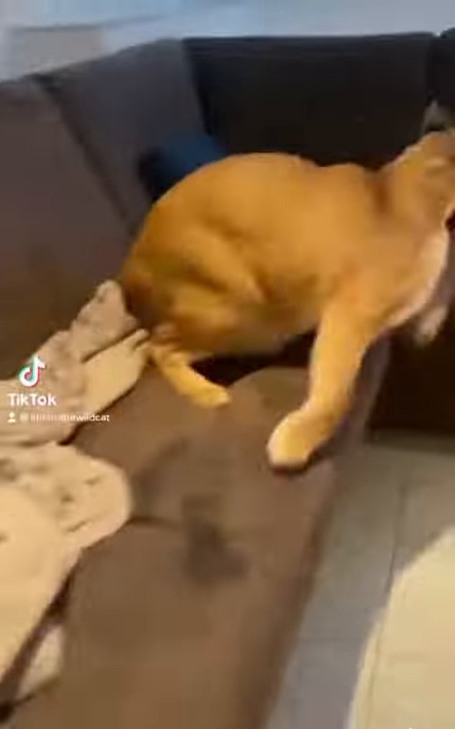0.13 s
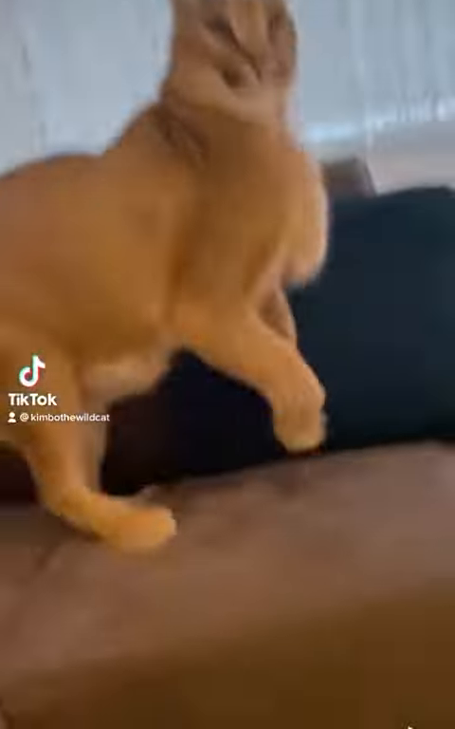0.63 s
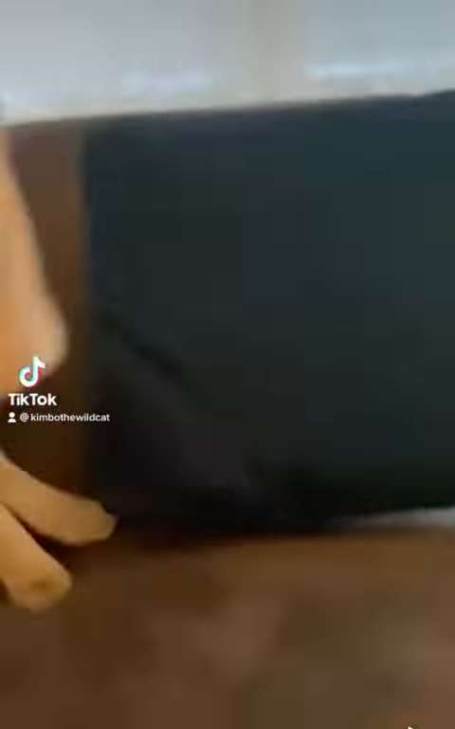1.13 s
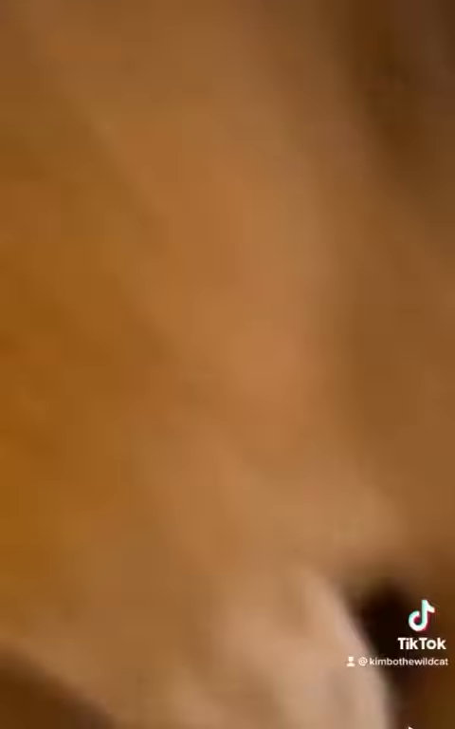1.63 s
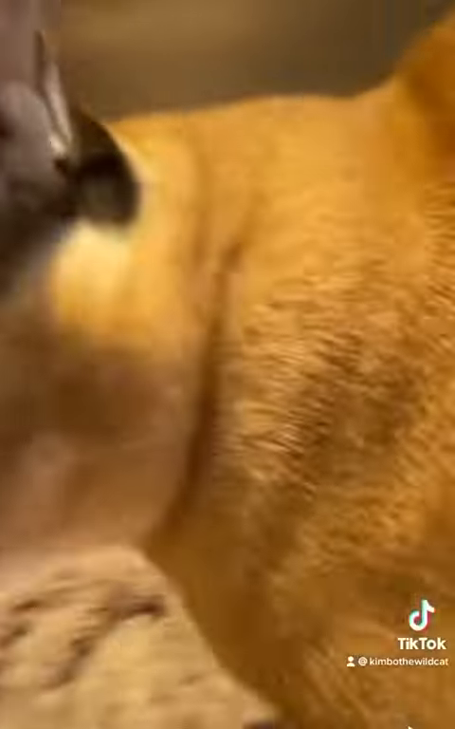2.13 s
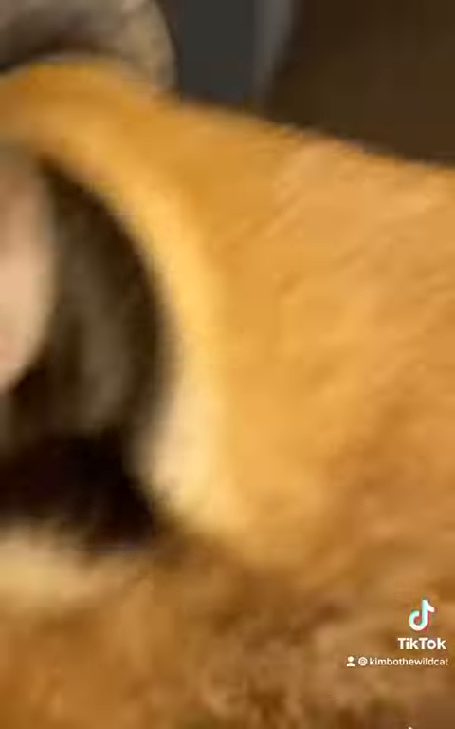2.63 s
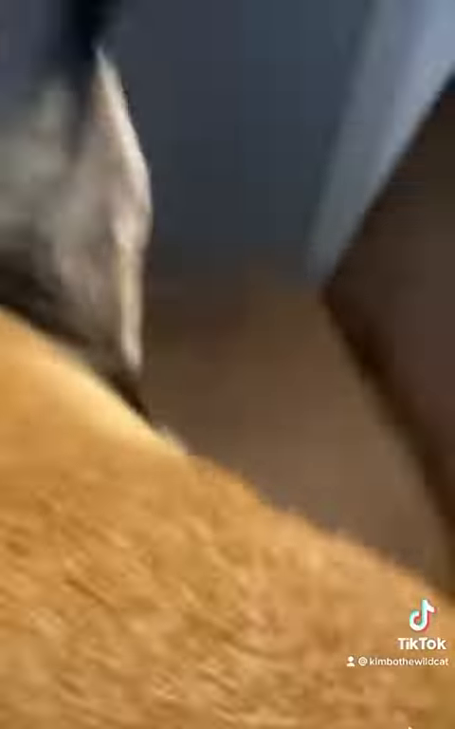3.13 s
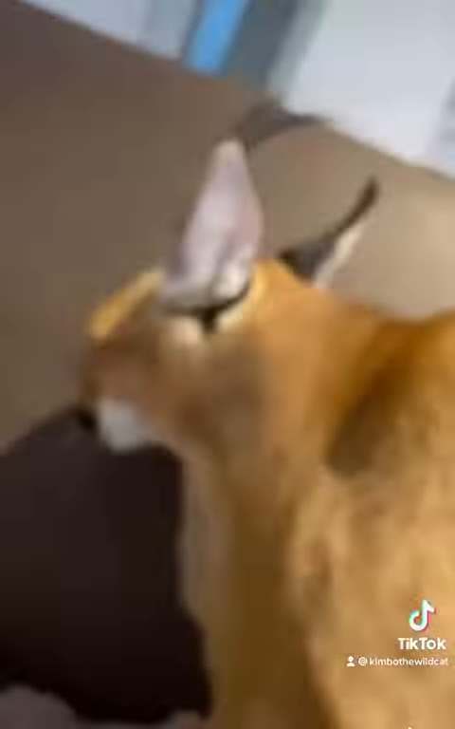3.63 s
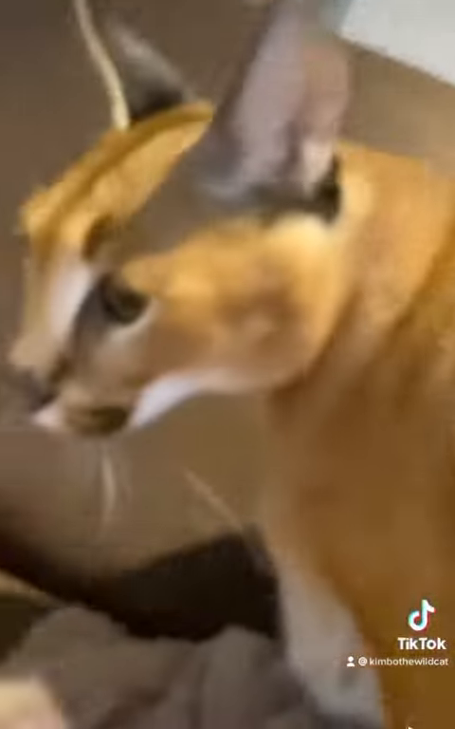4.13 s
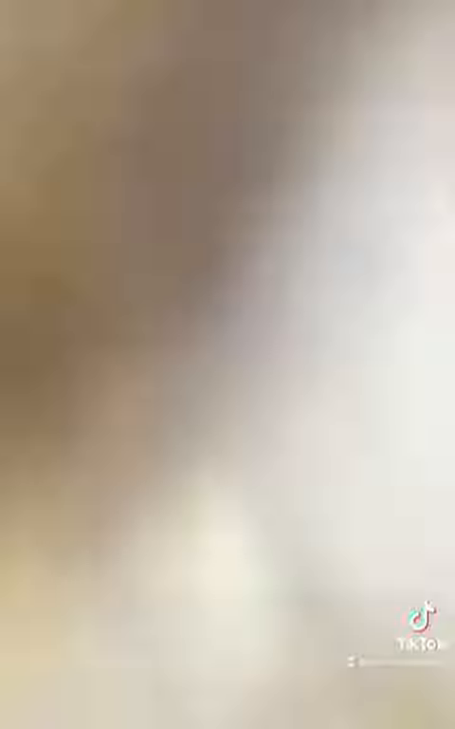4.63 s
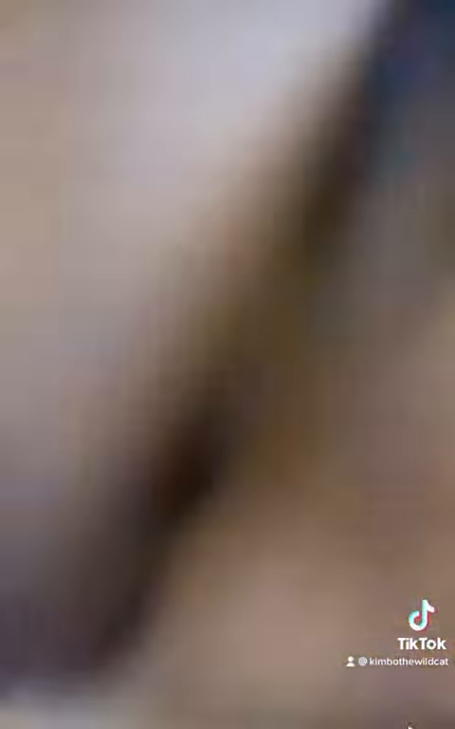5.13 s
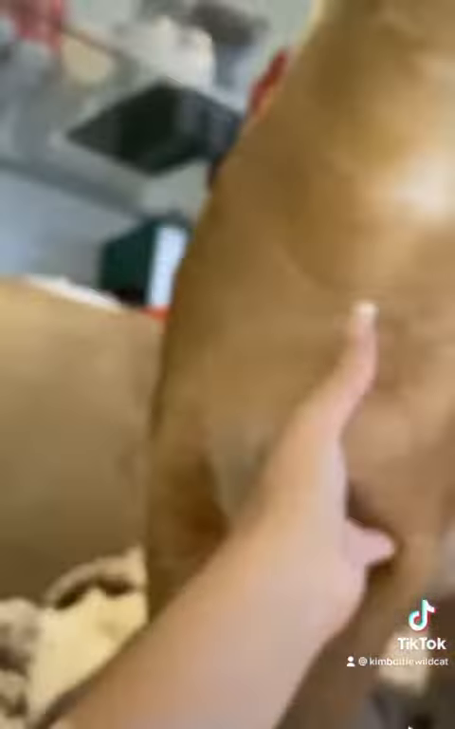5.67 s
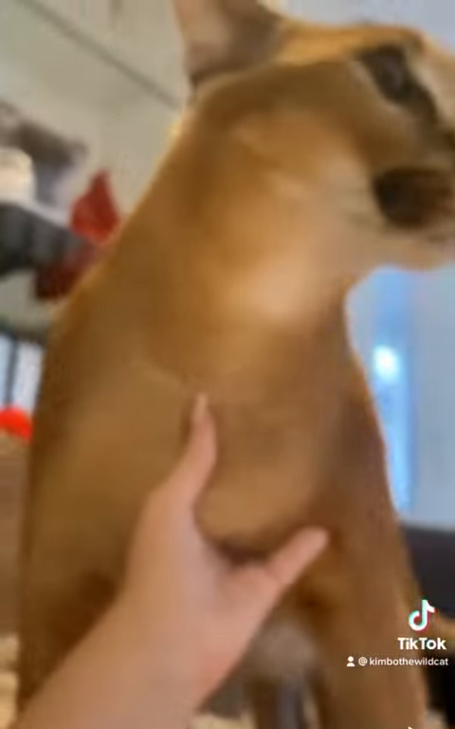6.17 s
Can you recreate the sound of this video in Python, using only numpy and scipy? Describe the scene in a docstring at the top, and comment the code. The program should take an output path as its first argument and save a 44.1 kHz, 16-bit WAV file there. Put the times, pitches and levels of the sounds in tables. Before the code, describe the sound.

Low padded paw thumps and cushion rumble with scuffing cloth, a sharp claw snap, hollow little taps and fur brushing close, fading to near silence.

```python
"""In a hard-floored room with a quiet hum of air, a large cat jumps and scrambles over a fabric sofa,
close to a hand-held phone. Paws thump as gliding, damped tones; noise-driven modes rumble in cushion and frame.
Cloth and fur rustle as coloured, flickering noise, claws tick as short noise bursts, and a small hollow
part pings. The ticks alone excite the room's tail; two ports a little apart hear it all in stereo."""
import sys
import numpy as np
from scipy import signal
from scipy.fft import rfft, irfft
from scipy.io import wavfile
from scipy.ndimage import uniform_filter1d

SR = 44100
rng = np.random.default_rng(int(sys.argv[2]) if len(sys.argv) > 2 else 0)


def gain_from_db(level_db):
    """Turn a decibel level (scalar or array-like) into a linear amplitude factor."""
    decades = np.asarray(level_db, float) / 20
    return 10 ** decades


def log_audio(samples):
    """Write samples as a 16-bit WAV file to the path given in sys.argv[1]."""
    # one column per channel
    frames = np.atleast_2d(samples).T
    # limit to full scale, then quantise
    limited = np.clip(frames, -1, 1)
    pcm = np.round(limited * 32767).astype(np.int16)
    wavfile.write(sys.argv[1], SR, pcm)


N = 276948
T = np.arange(N) / SR
SLOW = T[::32]  # coarse clock for gains, s


def unit(x):
    """Scale to rms 1."""
    return x / np.sqrt(np.mean(x ** 2))


def colour(x, points):
    """Causal filter through (freq_hz, level_db) points, from the folded cepstrum of the log gain."""
    hz, db = np.transpose(points)
    log_hz = np.log(np.maximum(np.fft.rfftfreq(8192, 1 / SR), 1))
    cepstrum = irfft(np.log(gain_from_db(np.interp(log_hz, np.log(hz), db))))
    # folding the later half onto the earlier makes the response minimum phase
    cepstrum[1:4096] *= 2
    cepstrum[4097:] = 0
    response = irfft(np.exp(rfft(cepstrum)))
    return signal.fftconvolve(x, response)[:len(x)]


def resonance(x, hz, width_hz):
    """Two-pole band-pass: one damped mode."""
    return signal.lfilter(*signal.iirpeak(hz, hz / width_hz, fs=SR), x)


def walk(rate):
    """Random levels, rate new ones per second, joined by ramps; spread 1."""
    hold = int(SR / rate)
    levels = np.repeat(rng.standard_normal(N // hold + 1), hold)
    return unit(uniform_filter1d(levels, hold)[:N])


def add(track, s, sound):
    """Mix a sound in at time s."""
    i = int(s * SR)
    track[..., i:i + sound.shape[-1]] += sound[..., :N - i]


def curve(table):
    """A (time_s, level_db) table over time, in dB."""
    return np.interp(SLOW, *np.transpose(table))


def smooth(gain):
    """A slow gain drawn out to every sample."""
    return np.interp(T, SLOW, gain)


def together(gains):
    """Unrelated sounds add in power."""
    return np.sqrt(sum(g ** 2 for g in gains))


def burst(s, rise_s, fade_s):
    """Gain that rises at time s and loses 20 dB every fade_s."""
    t = np.maximum(SLOW - s, 0)
    return (1 - np.exp(-t / rise_s)) * gain_from_db(-20 * t / fade_s)


def air_noise(spectrum, db):
    """Steady noise shaped to a spectrum, its level wavering by about 1 dB."""
    noise = unit(colour(rng.standard_normal(N), spectrum))
    return gain_from_db(db + 1.1 * walk(11.0)) * noise


# hum and hush of the room in the sum of the ports: freq_hz, level_db
AIR_SUM = [(18, -31), (30, 1), (71, -5), (103, -6), (204, -22.5), (239, -0.5), (287, -16.5), (684, -26),
           (1500, -46), (8000, -38), (16000, -64.5)]


def air_in_sum():
    """Room air that presses on both ports alike."""
    return air_noise(AIR_SUM, -63.5)


# the same air in the difference of the ports: freq_hz, level_db
AIR_DIFFERENCE = [(18, -56), (30, -25), (134, -1), (684, -5.5), (1010, -14), (4190, -25.5), (8740, -10.5),
                  (16000, -34.5)]


def air_in_difference():
    """Room air that differs between the ports."""
    return air_noise(AIR_DIFFERENCE, -69)


# decay time of each reverberant band: freq_hz, t60_s
ROOM_DECAY = [(250, 0.6), (1000, 0.51), (3000, 0.51), (8000, 0.33)]


def room(x, first_s=0.0056):
    """Dense reflections after a short gap, the highest band dying first; unrelated in sum and difference."""
    t = T[:SR]
    tail = np.zeros((2, SR))
    for hz, t60 in ROOM_DECAY:
        band = resonance(rng.standard_normal((2, SR)), hz, 1.7 * hz)
        tail += band * gain_from_db(-60 * t / t60) / np.sqrt(hz / 1000)
    tail = tail * (t > first_s)
    tail = tail / np.sqrt(np.sum(tail[0] ** 2)) * gain_from_db(12.5)
    return signal.fftconvolve(x[None], tail, axes=1)[:, :N]


def nearby(x, count, span_s=.012, echo_db=-17):
    """Early echoes off seat back, wall and floor comb the sound into uneven bands."""
    lags = rng.integers(40, int(span_s * SR), count)
    signs = rng.choice([-1, 1], count)
    echoes = sum(gain_from_db(echo_db) * sign * np.roll(x, lag, axis=1) for lag, sign in zip(lags, signs))
    return (x + echoes) / np.sqrt(1 + count * gain_from_db(2 * echo_db))


# weight shifting on the cushions: time_s, level_db
WEIGHT = [(0.0, -37.5), (0.31, -34.5), (0.93, -40), (1.08, -33), (1.52, -40.5), (2.76, -54.5), (3.25, -44),
          (3.38, -44.5), (3.58, -58.5), (3.93, -64.5), (4.42, -50.5), (5.02, -62.5), (5.98, -63.5),
          (6.28, -69.5)]
# low modes of cushion and frame: freq_hz, width_hz, level_db
CUSHION_MODES = [(56.8, 40, 6.5), (85, 48.5, -1), (134.9, 55, -13)]


def cushions():
    """Random pushes ring the low modes of cushion and frame, which shakes on after each thump."""
    push = rng.standard_normal((2, N))
    shake_db, shake_rise_s, shake_t60_s = -22, 0.0073, 0.7485  # level relative to the thump
    shakes = [gain_from_db(db + shake_db) * burst(s, shake_rise_s, shake_t60_s / 3) for s, db, _, _ in THUMPS]
    load = smooth(together([gain_from_db(curve(WEIGHT))] + shakes))
    rumble = sum(gain_from_db(db) * resonance(resonance(push, hz, width), hz, width)
                 for hz, width, db in CUSHION_MODES)
    return load * unit(rumble)


def rubbing(spectrum, flicker_db, rate, grain_db):
    """Fibres slip in short bunches: noise whose level flickers, with finer, faster grains."""
    slips = gain_from_db(flicker_db * walk(rate) + grain_db * walk(600.))
    return np.array([unit(colour(slips * rng.standard_normal(N), spectrum)) for _ in range(2)])


def patchy(x):
    """Each band of cloth noise swells and dips alone, as different folds slip."""
    spread_db, rate = 2.5, 30.  # rate: changes per s
    bands_hz = 600 * 1.5 ** np.arange(7)
    return x + sum((gain_from_db(spread_db * walk(rate)) - 1) * resonance(x, hz, hz / 2) for hz in bands_hz)


# cloth dragged by a sudden push, then fading 20 dB: start_s, drag_db, swish_db, fade_s
CLOTH_SCUFFS = [(0.303, -36.5, -47, 0.1849), (0.538, -31.5, -46, 0.1135), (0.711, -44, -50, 0.29),
                (.928, -32.5, -47, .05), (0.948, -30.5, -59, 0.2461), (1.796, -42, -60.5, 0.24),
                (1.985, -48, -66, 0.32), (2.281, -48, -56.5, 0.14), (3.284, -40.5, -58, 0.04),
                (4.72, -54, -83, 0.33)]
# cloth sweeps that swell and ebb, 20 dB down at reach_s from the middle: middle_s, drag_db, swish_db, reach_s
CLOTH_SWEEPS = [(.02, -52.5, -56.5, 0.67), (0.172, -41, -54, 0.22), (1.193, -44, -51.5, 0.036),
                (1.457, -47, -55.5, 0.0732), (1.58, -42, -56, 0.0244), (1.64, -55.5, -66, 0.14),
                (1.7, -43, -55, 0.03), (2.145, -60, -70.5, 0.24), (2.484, -51.5, -66, 0.11),
                (2.97, -54.5, -66.5, 0.25), (3.15, -59, -65.5, 0.2), (3.62, -64.5, -71, 0.33),
                (5.3, -63.5, -67.5, 0.41)]


def strokes(column, restless_db):
    """Gain of one cloth layer: rubbing that follows the shifting weight, plus every scuff and sweep."""
    # restless_db holds at a load of -40.5 dB; each dB of load moves it by 0.596 dB
    restless = gain_from_db(restless_db + 0.596 * (curve(WEIGHT) + 40.5))
    scuffs = [gain_from_db(r[column]) * burst(r[0], 0.003, r[3]) for r in CLOTH_SCUFFS]
    sweeps = [gain_from_db(r[column] - 20 * np.minimum(((SLOW - r[0]) / r[3]) ** 2, 10)) for r in CLOTH_SWEEPS]
    return together([restless] + scuffs + sweeps)


# fur brushing the phone itself: start_s, length_s, hollow_db, hiss_db, sag_db_per_s
FUR_BRUSHES = [(2.871, 0.13, -50, -60, 13), (4.391, 0.09, -46, -50.5, 32), (4.5, 1.14, -78, -67.5, 3),
               (4.555, 0.15, -53.5, -59, 46), (5.185, 0.1001, -74, -63, -78)]


def brush(column):
    """Gains of the fur touches: quick start, slow sag (or swell, if negative), soft lift."""
    rise_s, fade_s = 0.0046, 0.039  # fade: time to lose 20 dB after the fur lifts
    gains = []
    for row in FUR_BRUSHES:
        start, length, sag = row[0], row[1], row[4]
        t = SLOW - start
        lift_db = 20 * np.clip(t - length, 0, 1) / fade_s
        level = gain_from_db(row[column] - sag * np.clip(t, 0, length) - lift_db)
        gains.append(level * np.clip(t / rise_s, 0, 1))
    return gains


# dull drag of cloth: freq_hz, level_db
DRAG_SPECTRUM = [(120, -18), (250, 5), (450, 2.5), (700, -3.5), (1100, -11.5), (4000, -33)]
# bright swish of cloth: freq_hz, level_db
SWISH_SPECTRUM = [(300, -10.5), (1100, -2), (3000, -4.5), (6000, -15.5), (16500, -38.5)]
# hiss of fur: freq_hz, level_db
FUR_SPECTRUM = [(700, -22), (1300, -9.5), (2800, -3.5), (6000, -6), (12000, -5), (16000, -13)]


def rustle():
    """Drag and swish of cloth, the hiss of fur, and the cavity that brushing fur rings."""
    drag_gain = strokes(column=1, restless_db=-63.5)
    swish_gain = strokes(column=2, restless_db=-70.5)
    drag = smooth(drag_gain) * rubbing(DRAG_SPECTRUM, 2, 40., 3)
    swish = smooth(swish_gain) * rubbing(SWISH_SPECTRUM, 1.5, 30., 3)
    fur = rubbing(FUR_SPECTRUM, 1.5, 50., 2.5)
    raw = rubbing([(100, 0), (10000, 0)], 2, 70., 3)  # flat spectrum
    cavity_hz, width_hz = 660, 240
    hollow = unit(resonance(resonance(raw, cavity_hz, width_hz), cavity_hz, width_hz))
    # a little fur and hollow is heard in every swish
    fur_gain = together(brush(column=3) + [gain_from_db(-6.5) * swish_gain])
    hollow_gain = together(brush(column=2) + [gain_from_db(-10) * swish_gain])
    return patchy(drag + swish) + smooth(fur_gain) * fur + smooth(hollow_gain) * hollow


# small hollow part struck: start_s, level_db
HOLLOW_PINGS = [(1.331, -29.5), (1.819, -30.5), (1.87, -41.5), (2.064, -38), (2.223, -35), (2.243, -46.5),
                (2.345, -36.5), (2.46, -36), (2.711, -45), (2.888, -34), (2.904, -29), (2.954, -38),
                (2.98, -36), (3.063, -49), (3.415, -46), (4.442, -31.5), (4.448, -38.5), (4.454, -26),
                (4.472, -40), (4.85, -47.5), (4.927, -47), (6.261, -43.5)]


def pings(swell_s=0.0012):
    """One small damped cavity, a few cycles that swell and die."""
    out, t = np.zeros(N), T[:SR // 20]
    shape = (t / swell_s) ** 2 * np.exp(2 - t / swell_s) / 4
    for s, db in HOLLOW_PINGS:
        hz = 673 * (1 + 0.03 * rng.standard_normal())
        add(out, s, gain_from_db(db) * shape * np.sin(2 * np.pi * hz * t))
    return out


# claws catching and slaps on cloth: start_s, level_db, centre_hz, decay_s
CLAW_TICKS = [(0.199, -29, 2470, 0.0015), (0.303, -29.5, 5500, 0.0025), (0.318, -31.5, 5610, 0.0038),
              (.531, -29.5, 3800, 0.00219), (0.54, -25, 1300, 0.0014), (0.711, -35.5, 4430, 0.0016),
              (0.924, -35.5, 2230, 0.0019), (0.936, -18.5, 2400, 0.0046), (0.9512, -11.5, 3280, 0.00049),
              (.953, -11, 1300, 0.0018), (1.366, -43.5, 6940, 0.00085), (1.986, -43.5, 1700, 0.002),
              (2.849, -43.5, 900, 0.0011), (2.991, -48.5, 2200, 0.00204), (4.727, -43, 1700, 0.002),
              (4.848, -48, 3465, 0.0011), (4.927, -42.5, 3700, 0.00091), (5.28, -47, 2005, 0.0012),
              (6.259, -51, 1478, 0.000515)]


def ticks(spread=0.99):
    """Short broad noise bursts as (sum, difference, one snap sent to the room)."""
    out, t = np.zeros((3, N)), T[:SR // 10]
    snap_db = -17  # relative to the tick
    for s, db, hz, decay in CLAW_TICKS:
        noise = rng.standard_normal((2, len(t))) * np.sqrt(t) * np.exp(-t / decay)
        bursts = np.vstack([noise, t == 0])
        bursts = resonance(resonance(bursts, hz, spread * hz), hz, 2 * spread * hz)
        bursts = bursts / abs(bursts).max(axis=1, keepdims=True)
        add(out, s, gain_from_db([[db], [db], [db + snap_db]]) * bursts)
    return out


def blows(rows, glide, glide_turns, rise_turns, overtone, overtone_db, harder):
    """A blow starts high and sinks in pitch as the body gives; a stiffer mode, louder in hard blows, dies sooner."""
    out, t = np.zeros(N), T[:SR // 3]
    for s, db, hz, t60 in rows:
        turns = hz * t + glide * glide_turns * (1 - np.exp(-hz * t / glide_turns))
        stiff_level = gain_from_db(overtone_db + harder * (db + 15) - 60 * t / t60)
        stiff = stiff_level * np.sin(2 * np.pi * overtone * hz * t)
        envelope = gain_from_db(db - 60 * t / t60) * (1 - np.exp(-hz * t / rise_turns)) ** 2
        add(out, s, envelope * (np.sin(2 * np.pi * turns) + stiff))
    return out


# short taps against the phone's body: start_s, level_db, settling_pitch_hz
PHONE_TAPS = [(.533, -3.5, 205), (.5402, -7.5, 255), (1.798, -14.5, 291), (1.986, -26.5, 268),
              (1.999, -11, 262), (2.013, -19, 270), (2.04, -23, 270), (4.7217, -16.5, 269.6),
              (4.73, -13.5, 273), (4.747, -15, 260), (4.93, -25, 258), (5.53, -28, 225),
              (5.611, -24.5, 230.2), (5.875, -30, 204.4)]


def phone_taps():
    """The phone's small stiff body, knocked and quickly damped."""
    rows = [(s, db, hz, 0.017) for s, db, hz in PHONE_TAPS]  # one t60 for all, s
    return blows(rows, glide=4.56, glide_turns=0.277, rise_turns=0.73,
                 overtone=5.186, overtone_db=-7, harder=0.3)


# paws and body landing: start_s, level_db, settling_pitch_hz, t60_s
THUMPS = [(0.316, -10.5, 71.4, 0.085), (0.35, -16, 62.2, 0.182), (.544, -7.5, 88, 0.08),
          (.956, -17.5, 100.4, 0.212), (1.271, -24.5, 65.5, 0.165), (1.37, -27, 110.3, 0.075),
          (1.505, -28, 54.3, 0.32), (1.577, -24.5, 85, 0.112), (1.74, -16.5, 102.7, 0.14),
          (1.826, -24, 70, 0.19), (1.991, -13, 75.5, 0.044), (2.14, -29.5, 60.3, 0.19),
          (2.281, -32.5, 127.5, 0.073), (2.307, -26.5, 78, 0.087), (2.462, -24, 60, 0.127),
          (2.852, -28, 106.4, 0.1006), (2.888, -27.5, 75.2, 0.16), (3.154, -28.5, 67, 0.13),
          (3.294, -7, 92.9, 0.0615), (3.337, -26, 82, 0.17), (4.397, -27.5, 82.9, 0.099),
          (4.457, -19, 55.35, 0.095)]


def paw_thumps():
    """Soft cushions struck by paws and body, low and sinking in pitch."""
    return blows(THUMPS, glide=2.07, glide_turns=0.31, rise_turns=0.28,
                 overtone=2.687, overtone_db=-6.5, harder=.05)


def lean(x):
    """What the difference shares with the sum: a low-pass that lags, a high-pass that leads."""
    lag = signal.lfilter(*signal.butter(2, 600, fs=SR), x)
    lead = signal.lfilter(*signal.butter(2, 2300, "high", fs=SR), x)
    return gain_from_db(-9) * lag + gain_from_db(-7) * lead


# level of the sum of the two ports, with a deep dip near 9.5 kHz: freq_hz, level_db
PORT_SUM = [(20, -11.5), (40, 3), (5500, -1.5), (7000, -3.5), (9500, -38.5), (12000, -15.5), (14500, -3),
            (15700, -8), (16000, -49.5)]
# level of the difference of the ports, which loses the bass: freq_hz, level_db
PORT_DIFFERENCE = [(40, -20.5), (120, -10), (300, -11.5), (700, -1.5), (1300, -0.5), (4000, 0), (9000, -1),
                   (14000, -4.5), (15900, -29.5)]


def scene():
    """Sources as heard by the sum and the difference of the two ports, turned into left and right."""
    tick = ticks()
    knocks, small = paw_thumps() + phone_taps(), pings()
    both = cushions() + nearby(rustle(), count=6) + tick[:2] + room(tick[2])
    faint_ticks = gain_from_db(-21) * tick[0]  # a faint share of the ticks added to the sum, without its dip
    mid = colour(both[0] + knocks + small, PORT_SUM) + air_in_sum() + faint_ticks
    # the path difference delays near blows at one port
    late = np.roll(gain_from_db(-7.5) * knocks + gain_from_db(-6.0) * small, int(.0007 * SR))
    side = colour(both[1] + lean(both[0]) + late, PORT_DIFFERENCE) + air_in_difference()
    return np.array([mid + side, mid - side])


def band_limit(x):
    """A steep low-pass at the top of the band."""
    return signal.sosfilt(signal.butter(12, 16450, fs=SR, output="sos"), x)


def record(dry):
    """The finished mix as the phone stores it."""
    return band_limit(dry)


dry = scene()
out = record(dry)
log_audio(out)
```